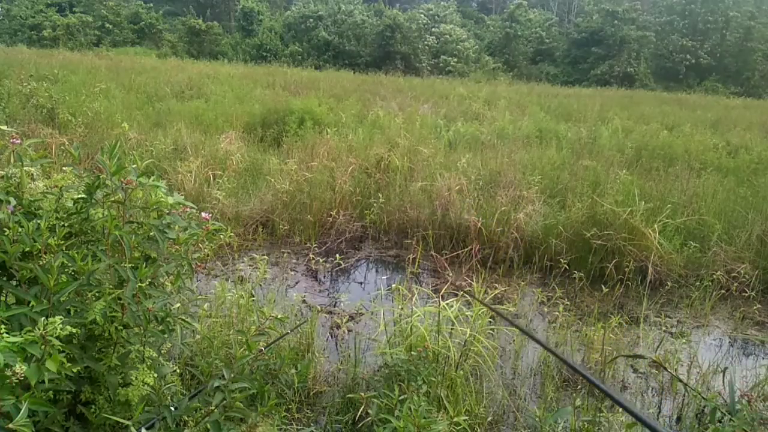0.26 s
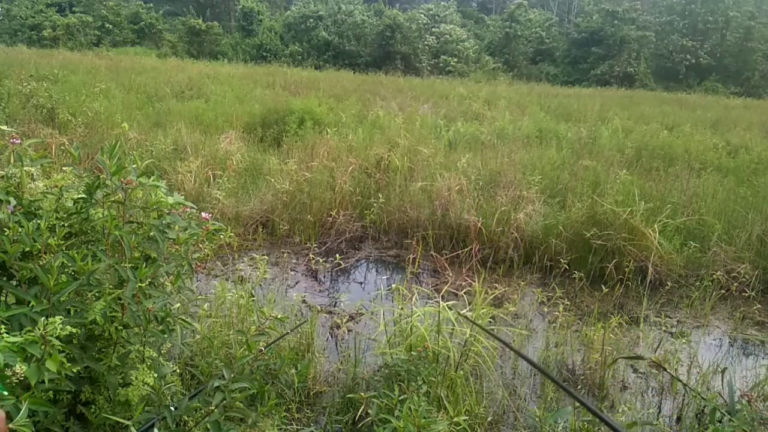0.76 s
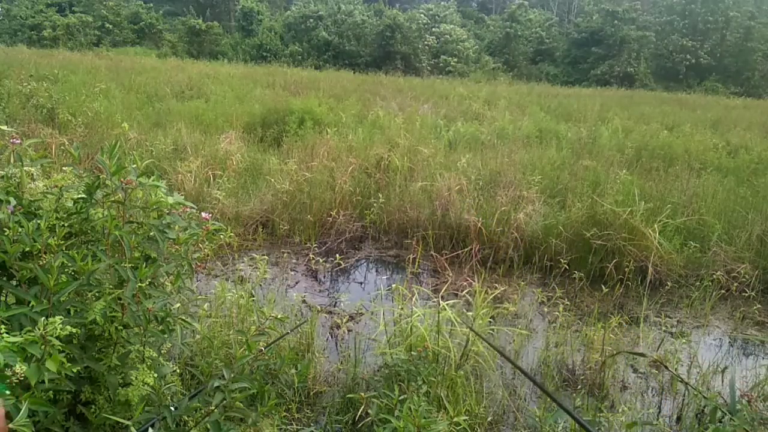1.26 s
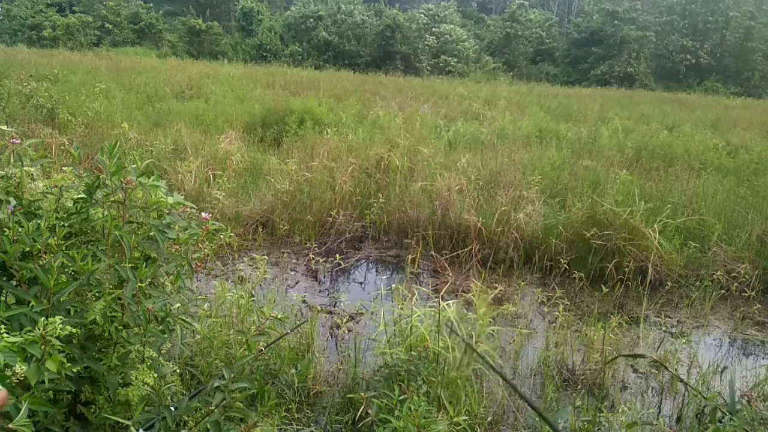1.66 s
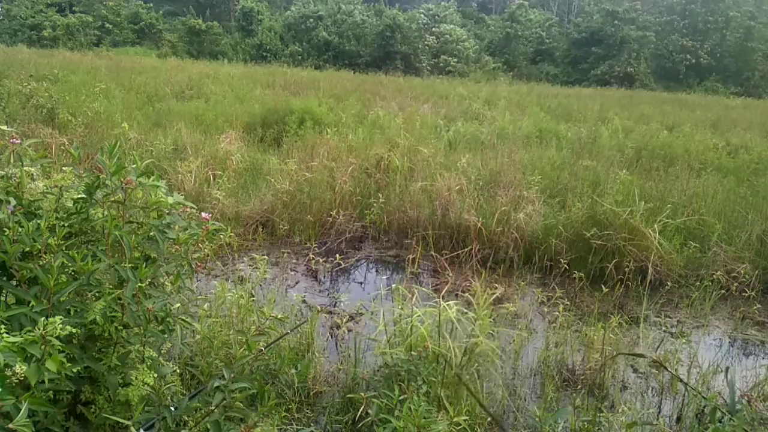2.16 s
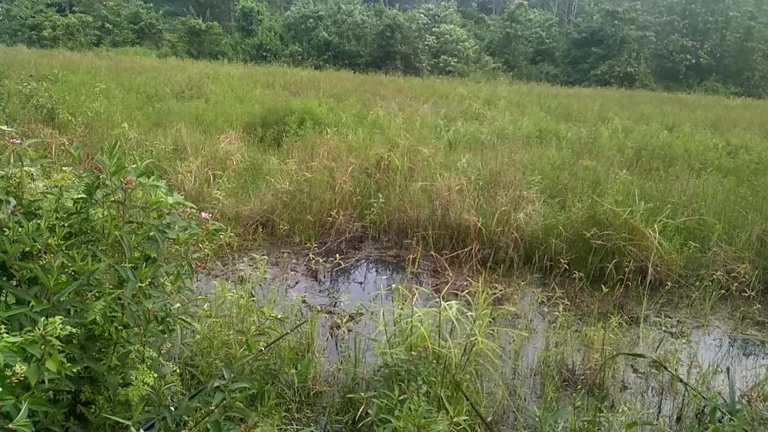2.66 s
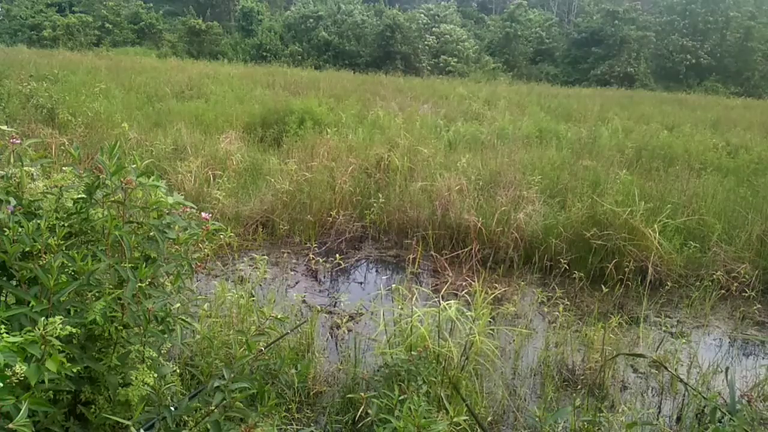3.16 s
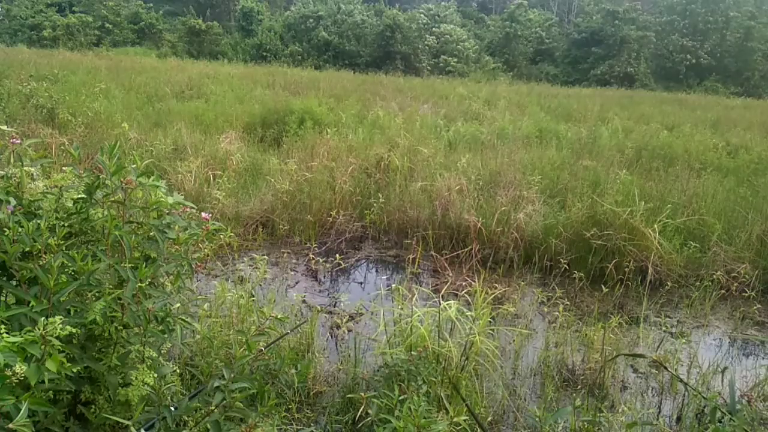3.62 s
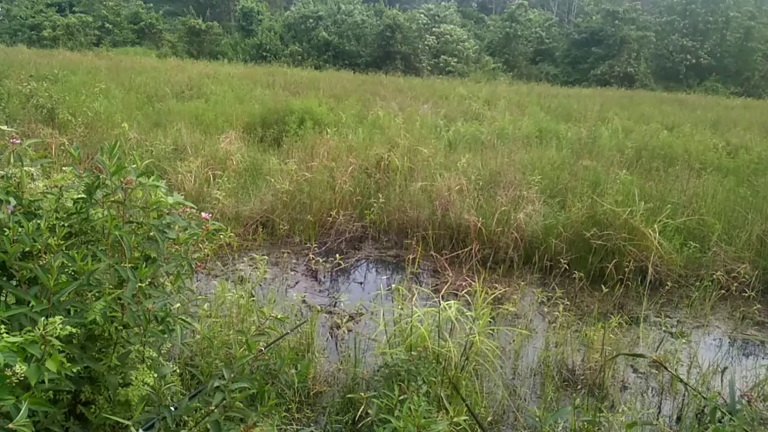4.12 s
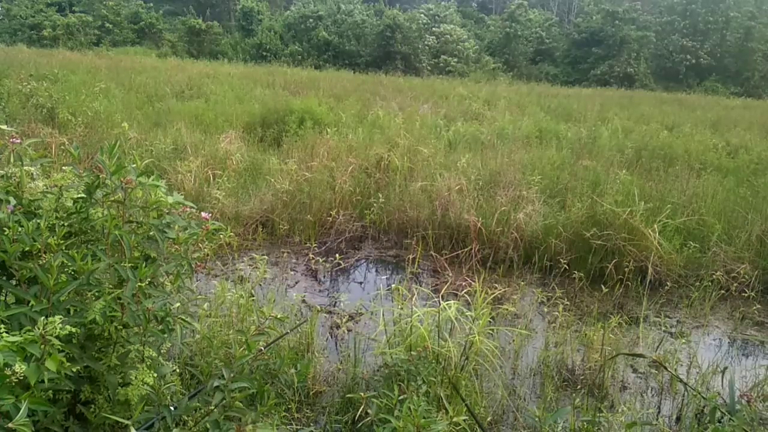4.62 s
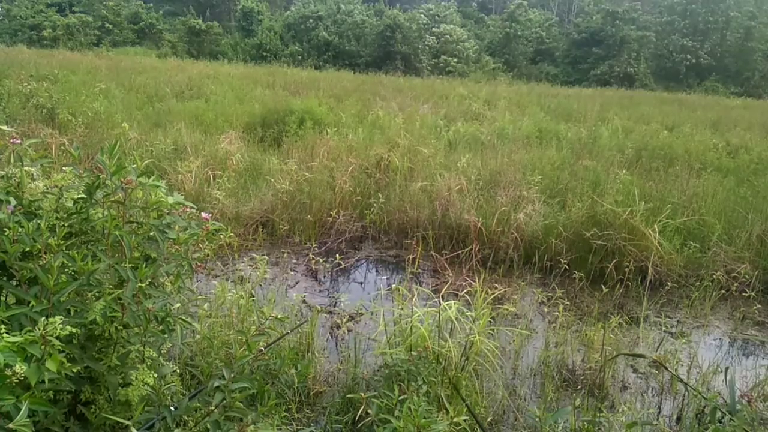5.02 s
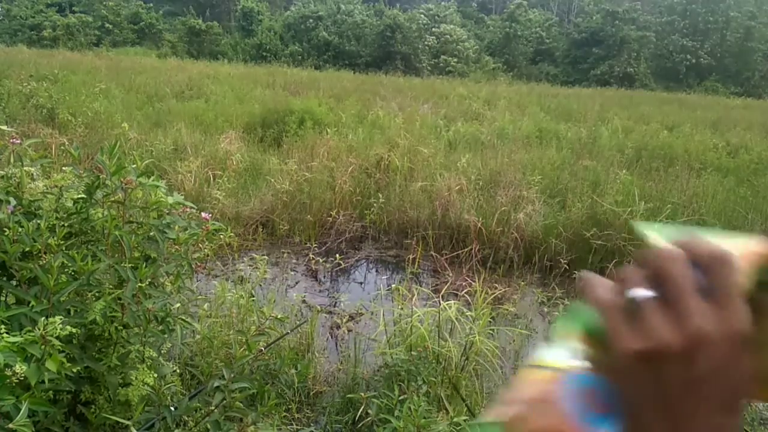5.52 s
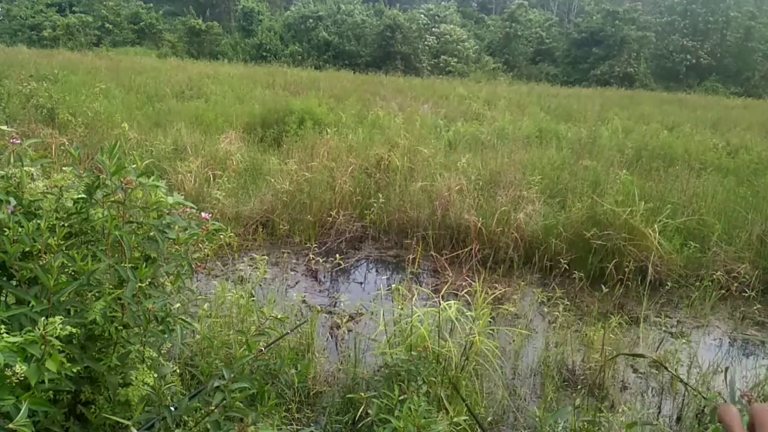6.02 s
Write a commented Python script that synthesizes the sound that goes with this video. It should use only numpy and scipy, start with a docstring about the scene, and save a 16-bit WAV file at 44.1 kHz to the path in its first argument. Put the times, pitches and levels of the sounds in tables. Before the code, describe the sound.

Marsh birds, crickets and katydids over a low rumble, with light handling knocks, until a nearby plastic bag crinkles from right to left.

```python
"""A plastic bag crackles close to the microphones, its film buckling as it is carried from right to left.
Before that an angler's gear ticks and thumps at arm's length. The place is a marsh on a summer day, taken
on a small camera with two microphone ports. One bird whips upward on the left, another repeats a double
chip on the right; katydids buzz and two crickets trill by scraping their wings.
Far off lie a hoarse bird song, a blur of leaves and a low rumble."""
import sys
import numpy as np
from scipy import signal
from scipy.fft import rfft, irfft, next_fast_len
from scipy.io import wavfile
from scipy.ndimage import uniform_filter1d, map_coordinates

SR = 44100
rng = np.random.default_rng(int(sys.argv[2]) if len(sys.argv) > 2 else 0)


def transcribe(u):
    """Save the signal u as a 16-bit wav file named by the first command-line argument.

    u: samples, shape (n,) or (channels, n), limited to [-1, 1]; the rate is SR.
    q: integer samples, one column per channel.
    """
    v = np.clip(np.atleast_2d(u).T, -1, 1)
    q = np.round(v * 32767).astype(np.int16)
    wavfile.write(sys.argv[1], SR, q)


N = 276948

# Levels are relative, ahead of panning and scatter; spectra give level per Hz.
# The bag's loudest buckles: t/s, length/s, level/dB, body at 600 Hz/dB, edge at 7500 Hz/dB
BUCKLES = [(4.824, 0.0015, -31, 8, 0), (4.833, 0.0041, -35, -7, -6), (4.873, 0.0031, -25.5, -7, 13),
           (4.899, 0.0071, -28, -9.5, -19), (4.951, 0.0032, -35, -5, -14), (4.959, 0.0046, -39, 6, 27),
           (4.994, 0.0014, -30.5, -1, -30), (5.006, 0.0045, -34.5, -3, 16), (5.027, 0.0021, -27, -19, -31),
           (5.038, 0.0061, -36.5, -11, -11), (5.082, 0.00015, -18, -2, -10.5),
           (5.163, 0.013, -34, 1.5, -7.5), (5.188, 0.0018, -30, -1, -30), (5.291, 0.0015, -36, 14, -2),
           (5.333, 0.0015, -25.5, -6, -10), (5.351, 0.0019, -35.5, 13, 3), (5.446, 0.00067, -28, 0, 11),
           (5.463, 0.0014, -26.5, 2, 2), (5.478, 0.0058, -39.5, 4, -13), (5.552, 0.0013, -37, -12, 0),
           (5.557, 0.0012, -33.5, -20, 1), (5.586, 0.0015, -41, -10, 15), (5.602, 0.0033, -36.5, 0, 8),
           (5.626, 0.0014, -36.5, 9, 0), (5.657, 0.002, -23, 6.5, 8), (5.682, 0.0005, -24, -10, 26),
           (5.696, 0.00067, -34, 25, 14), (5.743, 0.0038, -30.5, -16, 3.5), (5.751, 0.0011, -33.5, 17, -20),
           (5.796, 0.0017, -31.5, -22, 7), (5.8, 0.0011, -28, -22, 0), (5.816, 0.0023, -37, 39, 0),
           (5.845, 0.031, -41, 21, 13.5), (5.889, 0.0012, -27, -26, 3), (5.91, 0.0027, -38, -16, -20),
           (5.976, 0.012, -32, 11.5, -3.5), (5.989, 0.017, -38.5, 12, -12), (6.037, 0.0012, -33.5, -9, -4),
           (6.133, 0.003, -30.5, -48, -7), (6.166, 0.0032, -38.5, -3, 17), (6.217, 0.0034, -39, -20, 2),
           (6.24, 0.0091, -40.5, 4, 10), (6.271, 0.0006, -27, 0, 1)]
# The bag's path past the camera: t/s, lag of the left port/samples
BAG_PATH = [(4.4, 7), (5.3, 9.5), (5.6, -0.5), (6.28, -10)]
FILM_SPECTRUM = [(88, -40), (150, -13.5), (370, -10), (459, -9.5), (795, -10.5), (1460, -5.5), (2430, -4.5),
                 (3820, -5.5), (5650, -12), (8880, -11), (10400, -14.5), (13100, -29), (15400, -38),
                 (16300, -50)]
PALM_SPECTRUM = [(90, -22), (200, -9.5), (450, -8), (1200, -5.5), (2500, -23)]
SIZZLE_SPECTRUM = [(10500, -60), (11600, -6), (13000, -5), (14500, 7), (15700, -6), (16300, -30)]
# Strength of the crumpling, the sliding and the coding sizzle: t/s, level/dB
CRUMPLE_LEVEL = [(4.3, -100), (4.56, -63.5), (4.68, -59.5), (4.74, -69), (4.82, -56), (4.95, -46.5),
                 (5.06, -58.5), (5.2, -52), (5.3, -56.5), (5.8, -49.5), (6.02, -49.5), (6.08, -57),
                 (6.28, -47)]
SCRAPE_LEVEL = [(4.5, -75), (4.688, -88), (4.89, -55.5), (4.99, -58), (5.074, -51.5), (5.33, -51.5),
                (5.852, -50.5), (5.972, -55.5), (6.28, -61)]
SIZZLE_LEVEL = [(4.78, -102), (4.972, -68), (5.076, -70), (5.368, -77), (5.544, -79), (5.686, -74),
                (6.004, -75), (6.28, -74)]
# Handling knocks, gear first, then the bag being picked up: t/s, thump/dB, click/dB, tick/dB
KNOCKS = [(.011, -46, -54, -64), (.063, -42.5, -52, -53), (0.261, -50, -66, -70), (0.309, -67, -49, -59),
          (0.617, -43, -56, -50.5), (0.661, -46, -60, -52), (0.714, -42.5, -60, -58),
          (.765, -40, -55, -51.5), (.814, -44, -71, -61), (.863, -35.5, -55, -51), (0.937, -49, -72, -56),
          (1.014, -38, -60, -55), (1.093, -46, -57, -58), (1.7, -50, -66, -54), (2.245, -43, -56, -51),
          (2.569, -64, -62, -47.5), (2.582, -48, -61, -49), (2.607, -46, -75, -58),
          (2.637, -43.5, -77, -60), (3.211, -43.5, -64, -57), (3.257, -44.5, -61, -55.5),
          (3.341, -47, -71, -56), (3.709, -56, -61, -46), (3.867, -52, -53.5, -53), (4.174, -67, -74, -57),
          (4.372, -49, -82, -56), (4.442, -48, -76, -53.5), (4.566, -63, -65, -60), (4.605, -49, -46, -49),
          (4.628, -43, -58, -42.5), (4.664, -50, -40.5, -45.5), (4.722, -59, -65, -48.5),
          (4.757, -56, -46, -51), (4.771, -55, -41.5, -50)]
# Modes of a handling thump: f/Hz, level/dB, t60/s
THUMP_MODES = [(322, -1.5, 0.024), (420, -5.5, 0.028), (696, -2.5, 0.011)]
# A hand shifting on the grip: t/s, length/s, level/dB
GRIP_RUBS = [(1.506, 0.024, -60), (1.583, 0.048, -60), (1.664, 0.038, -62.5)]
# Spectra of a rub, a click and a tick: f/Hz, level/dB
GRIP_SPECTRUM = [(150, -9), (300, 0), (470, 3), (650, -13), (1200, -17)]
CLICK_SPECTRUM = [(500, 0.5), (900, 0), (1600, 0.5), (2500, -7)]
TICK_SPECTRUM = [(1200, -23), (2000, -4.5), (4000, -12), (6500, -19.5), (9000, -21), (11500, -36)]
# Calls of the bird on the left: t/s, pitch factor, lead note/dB, sweep/dB
WHIP_CALLS = [(.208, .975, -2, -1), (.687, 1, 0, 0), (1.053, .98, 1.5, -1), (1.731, .985, -3, -2.5),
              (2.991, 1, -1.5, -2), (3.559, 1, -1.5, -2), (3.944, .99, -3, -3), (4.652, .98, -5, -7)]
# Calls of the bird on the right: t/s, level/dB
CHIP_CALLS = [(.072, -18), (.247, -5), (.416, 0), (.6, -4), (.809, -1), (.992, -5), (1.168, -2),
              (1.335, -2), (1.495, 1), (1.661, 0.5), (1.855, 0), (2.008, 0), (2.166, 3), (2.321, 0.5),
              (2.481, 0), (2.626, -0.5), (2.794, 1.5), (2.949, 0.5), (3.098, 1.5), (3.228, 3), (3.377, 2),
              (3.519, 1.5), (3.669, 2.5), (3.805, 1), (3.945, 1), (4.078, 2), (4.212, 1), (4.358, 2),
              (4.497, 1)]
# Notes of a call: offset/s, length/s, first f/Hz, last f/Hz, peak/dB, peak place 0-1, swell/dB, fade/dB
WHIP_NOTES = [(-.08, 0.0126, 3610, 3030, -51.5, 0.3, 16, 6),
              (-.038, .048, 1970, 4976, -48.5, 0.3, 14, -0.2)]  # lead, sweep
CHIP_NOTES = [(-0.015, 0.009, 2510, 2640, -55, 0.44, 12, 5.8),
              (-.02, 0.0162, 2600, 2930, -52.5, 0.99, 6.7, 5.7),
              (-0.0098, .015, 2050, 2300, -55.5, 0.93, 5.6, 8.8)]  # short upper, long upper, lower
# How well each pitch carries to the tree line: f/Hz, level/dB
TREE_LINE = [(2000, -5.5), (3200, -3), (4400, -2), (4950, -1), (5150, -29)]
# Drift of the near katydid and the near cricket from a steady beat: t/s, lead/cycles
KATYDID_DRIFT = [(0, .07), (.75, 0), (2.5, .03), (3.7, .19), (4.6, .18), (6.28, .22)]
CRICKET_DRIFT = [(0, .23), (.9, .18), (2.8, .28), (3.5, .25), (4.1, .3), (6.28, .25)]
# Spectrum of katydid wings: f/Hz, level/dB
WING_SPECTRUM = [(4820, -34.5), (8200, -23.5), (8790, -19.5), (9790, -2), (10200, 0.5), (10800, -6),
                 (11700, -76), (15200, -75), (22000, -120)]
# The near cricket falters: from t/s, to t/s, drop/dB
CRICKET_LULLS = [(3.36, 3.6, 16), (4.66, 5.5, 7)]
# Strength of the far crickets: t/s, level/dB
DRONE_LEVEL = [(0, -86), (2, -77), (3, -84), (6.28, -64)]
# Songs of the distant bird, timed at mid-fall: t/s, level/dB
FAR_SONGS = [(.37, -78), (1.46, -80), (3.299, -79), (4.33, -79)]
# Its clearest notes: t/s, f/Hz, level/dB
FAR_NOTES = [(1.33, 4670, -66), (1.46, 4250, -64), (3.235, 4450, -63), (3.815, 3650, -59),
             (4.28, 4380, -65)]
# Spectra of far rumble and air, and of far birds and leaves: f/Hz, level/dB
RUMBLE_SPECTRUM = [(12, -64), (20, 5.5), (40, 1.5), (63, 5.5), (85, -2.5), (133, -2), (221, -17.5),
                   (290, -18.5), (401, -25), (1080, -38), (1500, -52), (1950, -78), (3300, -120)]
MEADOW_SPECTRUM = [(500, -120), (900, -15), (1500, -1.5), (2300, 2), (4700, 4), (5400, 0), (8500, -4),
                   (11300, 7.5), (11800, -120)]
# Strength of the rumble: t/s, level/dB
RUMBLE_LEVEL = [(0.0, -49.5), (1.54, -52), (3.1, -50.5), (6.28, -49.5)]
# Diffuse sound at the two ports: f/Hz, left-right correlation
PORT_LIKENESS = [(60, 0.9), (150, 1), (380, 0.56), (950, -0.13), (2380, 0.042), (5980, -0.15),
                 (15000, 0.26)]

QUIET_TOP_HZ, CAMERA_TOP_HZ = 11600, 16300
PUFF_LEAD = 256  # samples of padding ahead of a burst


def bag():
    """Close up, right to left: film snaps, crackles and hisses under a sliding hand."""
    lag = curve(BAG_PATH)
    snaps, grains = film_snaps(lag), film_grains(lag)
    palm = amp(3 * wobble(25)) * rush(PALM_SPECTRUM, patchy_db=2.5)
    scrape = amp(curve([(4.3, -100), *SCRAPE_LEVEL])) * palm
    hiss = rush(FILM_SPECTRUM, patchy_db=-4.5)
    crackle = amp(curve(CRUMPLE_LEVEL)) * (amp(4.5) * grains + amp(-2) * hiss)
    rustle = filtered(crackle + scrape, lambda hz: amp(-30 * (hz > 11500)))
    near = snaps + rustle + coding_sizzle() * amp((-2 - .15 * lag) * [[1], [-1]])  # treble is shaded most
    scatter = amp(-11) * echoes(near[:1], t60=.025, gap=.0015, size=SR // 20)
    pan_db = .8 - .26 * lag  # the camera body shades the far port
    return (near + scatter) * amp(pan_db * [[.5], [-.5]])


def film_snaps(lag):
    """Facets of the film buckle loudly, each favouring its own resonances."""
    snaps, facet_hz = np.zeros((2, N)), np.geomspace(200, 15500, 24)
    for s, length, db, body_db, edge_db in BUCKLES:
        tilt = [(220, body_db - 6.5), (600, body_db), (2700, 0),
                (5000, .6 * min(edge_db, 0)), (7500, edge_db)]
        gains_db = along(FILM_SPECTRUM, facet_hz) + along(tilt, facet_hz)
        gains_db += rng.normal(0, 4, len(facet_hz))
        snap = burst(list(zip(facet_hz, gains_db)), hold=length, t60=.003 + 1.25 * length, db=db)
        add(snaps, s - PUFF_LEAD / SR, snap, lag[int(s * SR)])
    return snaps


def film_grains(lag):
    """Small facets buckle in dense clumps from 4.3 s on."""
    clicks_per_s = 1700 * np.exp(.6 * wobble(60))
    at = np.flatnonzero((rng.random(N) < clicks_per_s / SR)[:-64] & (np.arange(N - 64) > 4.3 * SR))
    size, spread = rng.standard_normal((2, N))[:, at]
    size = np.sign(spread) * amp(3.6 * np.minimum(size, 2.4))
    late = np.rint(lag[at] + 4 * spread).astype(int)  # facets lie at different places on the bag
    clicks = np.array([np.bincount(at + late, size, N), np.bincount(at, size, N)])
    grains = coloured(patchy(clicks, depth_db=6, size=256, wide=5, long=1), FILM_SPECTRUM)
    return grains / np.sqrt(np.mean(grains[:, int(4.4 * SR):] ** 2))


def coding_sizzle():
    """Patchy top-treble sizzle that the camera's audio coding gives the crackling bag."""
    level_db = curve([(4.6, -110), *SIZZLE_LEVEL]) + 4.2 * wobble(30)
    return amp(level_db) * rush(SIZZLE_SPECTRUM, patchy_db=10)


def handling():
    """At arm's length: thumps, clicks, ticks and soft rubs; gear first, then the bag being picked up."""
    out, t = np.zeros((2, N)), np.arange(SR // 20) / SR
    for s, thump_db, click_db, tick_db in KNOCKS:
        ring = sum(amp(db + rng.normal(0, 2) - 60 * t / t60)
                   * np.sin(2 * np.pi * hz * rng.normal(1, .08) * t) for hz, db, t60 in THUMP_MODES)
        add(out, s, amp(thump_db) * ring * (1 - np.exp(-t / .0015)), lag=15.7)
        start = s - PUFF_LEAD / SR
        add(out, start, burst(CLICK_SPECTRUM, hold=.00031, t60=.016, db=click_db), lag=3.7)
        add(out, start, burst(TICK_SPECTRUM, hold=.00021, t60=.035, db=tick_db), lag=13.1)
    for s, length, db in GRIP_RUBS:
        add(out, s, burst(GRIP_SPECTRUM, hold=length, t60=.04, db=db), lag=12)
    return out + amp(-9) * echoes(out[:1], t60=.1, gap=.003, size=SR // 10)


def whip_bird():
    """Off to the left: a short lead note and a fast upward whistle, thrown back by the tree line."""
    whips = np.zeros((2, N))
    for s, pitch, *note_dbs in WHIP_CALLS:
        for db, (start, length, first_hz, last_hz, *shape) in zip(note_dbs, WHIP_NOTES):
            note = whistle(length, pitch * first_hz, pitch * last_hz, *shape)
            add(whips, s + start, amp(db) * note, lag=-4.5)
    whips *= amp([[0], [-3]])
    at_trees = coloured(whips[:1], TREE_LINE)
    for share, ripple_hz in ((.6, 645), (.5, 1570)):  # bounces off water and bank ripple the sweep
        whips = whips + share * np.roll(whips, round(SR / ripple_hz), axis=1)
    return whips + amp(-.5) * echoes(at_trees, t60=.55, gap=.0052)


def chip_bird():
    """Off to the right: a double chip whose upper note is short and long in turn."""
    chips = np.zeros((2, N))
    for k, (s, db) in enumerate(CHIP_CALLS):
        for start, *note in (CHIP_NOTES[k % 2], CHIP_NOTES[2]):
            add(chips, s + start, amp(db) * whistle(*note), lag=11)
    return chips + amp(-7.5) * echoes(chips[:1], t60=1, gap=.0052)


def katydids():
    """Each wing stroke of the near one swells and breaks off; the far chorus blurs into hiss."""
    stroke_hz = 102.2
    stroke = (stroke_hz * np.arange(N) / SR + curve(KATYDID_DRIFT)) % 1
    swell = unit(uniform_filter1d(.1 + stroke ** 3, size=24))
    wings = unit(coloured(rng.standard_normal(N), WING_SPECTRUM))
    near = ports(amp(-62 + .15 * wobble(6.2)) * swell * wings, lag=-4.5, pan_db=-12)
    chorus = rush(WING_SPECTRUM, patchy_db=.6)
    return near + amp(-55) * chorus * amp([[-.8], [.8]])


def cricket(phase, duty, hz, rise_hz, db):
    """Tone pulses that rise in pitch as the wing's file speeds up; the tooth strikes are a bit uneven."""
    progress = (phase % 1) / duty
    gate = uniform_filter1d((progress < 1) * 1., size=220)
    tone = sine(hz + rise_hz * np.minimum(progress, 1) + 75 * wobble(300))
    return amp(db + 2.2 * wobble(180) + .6 * wobble(6)) * gate * tone


def crickets():
    """A near one trills on the left, a lower one chirps in pulse pairs, far ones merge into a thin band."""
    t, pulse_hz = np.arange(N) / SR, 16.2
    phase = pulse_hz * t + curve(CRICKET_DRIFT) - .753
    lull_db = sum(drop_db * (t > start) * (t < end) for start, end, drop_db in CRICKET_LULLS)
    trill = cricket(phase, duty=.54, hz=7520, rise_hz=150, db=-64.5 + .62 * t - lull_db)
    since_chirp = (t - .1) % .2143
    pairs = (since_chirp < .095) * cricket(since_chirp / .052, duty=.7, hz=7060, rise_hz=110, db=-65)
    direct = ports(trill, lag=3.8, pan_db=13.5) + ports(pairs, lag=3.73, pan_db=5.5)
    band = lambda hz: np.exp(-((hz - 4640) / 160) ** 2)
    drone = amp(curve(DRONE_LEVEL) + 1.5 * wobble(12)) * unit(filtered(rng.standard_normal((2, N)), band))
    return drone + direct + amp(-5) * echoes(direct.mean(0, keepdims=True), t60=.2, gap=.005)


def far_bird():
    """Far off: a hoarse, broken trill slides down and arrives mostly as scatter; a few notes carry."""
    song, waver_hz = np.zeros(N), 120 * wobble(60) + 200 * wobble(400)
    broken = amp(3.5 * wobble(21))
    around = np.arange(-SR // 2, SR // 2)
    t = around / SR
    glide_hz = np.interp(t, [-.1, .1], [4780, 3800])
    fade = np.clip(np.minimum(t + .195, .26 - t) / .054, 0, 1)
    gate = fade * np.sin(np.pi * 21 * t) ** 4  # 21 notes a second
    for s, db in FAR_SONGS:
        at = np.clip(round(s * SR) + around, 0, N - 1)
        song[at] += amp(db) * broken[at] * gate * sine(glide_hz + waver_hz[at])
    notes = np.zeros((2, N))
    for s, hz, db in FAR_NOTES:
        add(notes, s, whistle(.029, 1.01 * hz, .99 * hz, db, place=.4, swell_db=9, fade_db=9))
    clear = notes + amp(-3) * echoes(notes[:1], t60=.15, gap=.004, size=SR // 5)
    return clear + ports(song, lag=3.2, pan_db=-22) + amp(14) * echoes(song[None], t60=.34, gap=.0033)


def marsh():
    """All around: far rumble below, a blur of distant birds and leaves above."""
    rumble = amp(curve(RUMBLE_LEVEL) + 1.2 * wobble(3)) * rush(RUMBLE_SPECTRUM, patchy_db=.5)
    meadow = amp(-65.5) * rush(MEADOW_SPECTRUM, patchy_db=1.6)
    return rumble * amp([[.6], [-.6]]) + meadow * amp([[.4], [-.4]])


def echoes(x, t60, gap, size=SR // 2):
    """Scatter from reeds and trees, different at each port, new every quarter second as the reeds sway."""
    step = SR // 4
    t, out = np.arange(size) / SR, np.zeros((2, N + 4 * step))
    for at in range(0, N, step):
        tail = rng.standard_normal((2, size)) * amp(-60 * t / t60) * (t > gap)
        scatter = signal.fftconvolve(x[:, at:at + step], tail / np.linalg.norm(tail[0]), axes=1)
        out[:, at:at + scatter.shape[1]] += scatter
    return out[:, :N]


def burst(spectrum, hold, t60, db):
    """A coloured puff of noise that swells fast, holds in uneven spurts, then dies in t60 seconds."""
    t = np.arange(SR // 10) / SR
    spurts = amp(3 * np.repeat(rng.standard_normal(len(t) // 30), 30))
    attack = np.minimum(t / (.0004 + .35 * hold), 1)
    shape = attack * amp(-60 * np.maximum(t - hold, 0) / max(t60, .002))
    puff = np.pad(rng.standard_normal(len(t)) * spurts * shape, (PUFF_LEAD, 0))
    chance_colour = np.sqrt(np.abs(uniform_filter1d(np.abs(rfft(puff)) ** 2, size=50)) + 1e-9)
    x = coloured(irfft(rfft(puff) / chance_colour, len(puff)), spectrum)
    return amp(db) * x * np.linalg.norm(shape) / np.linalg.norm(x)


def whistle(length, first_hz, last_hz, peak_db, place, swell_db, fade_db, bend=.7, edge_s=.0009):
    """A pure tone gliding along an S-curve; it swells to its peak and fades."""
    u = np.arange(round(length * SR)) / (length * SR)
    glide = u + bend * (u * u * (3 - 2 * u) - u)
    edges = np.minimum(np.minimum(u, 1 - u) * length / edge_s, 1)
    level_db = peak_db - np.interp(u, [0, place, 1], [swell_db, 0, fade_db])
    return amp(level_db) * edges * sine(first_hz + (last_hz - first_hz) * glide)


def rush(spectrum, patchy_db):
    """Diffuse stereo noise of rms 1."""
    pair = patchy(rng.standard_normal((2, N)), patchy_db, size=512, wide=6, long=14)
    turn = lambda hz: np.arccos(np.clip(along(PORT_LIKENESS, hz), -1, 1)) / 2
    mid, side = filtered(pair, lambda hz: amp(along(spectrum, hz)) * [np.cos(turn(hz)), np.sin(turn(hz))])
    return unit(np.array([mid + side, mid - side]))


def patchy(x, depth_db, size, wide, long):
    """x under a random gain field, smooth over wide bins and long frames."""
    frames = signal.stft(x, nperseg=size)[2]
    field = uniform_filter1d(uniform_filter1d(rng.standard_normal(frames.shape[-2:]), wide, 0), long, 1)
    return signal.istft(frames * amp(depth_db * unit(field)), nperseg=size)[1][..., :N]


def ports(x, lag, pan_db):
    """One source at both ports: the left lags by lag samples and is pan_db louder."""
    half = np.array([[.5], [-.5]])
    return filtered(x * amp(half * pan_db), lambda hz: np.exp(-2j * np.pi * hz * half * lag / SR))


def add(track, s, sound, lag=0):
    """Mix a mono sound into both ports at second s, the left lag samples late."""
    for port, late in zip(track, (lag, 0)):
        at = max(round(s * SR + late), 0)
        port[at:at + len(sound)] += sound[:len(port) - at]


def filtered(x, response):
    """x times a response of frequency."""
    n = x.shape[-1]
    padded = next_fast_len(n + 8192)
    return irfft(rfft(x, padded) * response(np.fft.rfftfreq(padded, 1 / SR)), padded)[..., :n]


def coloured(x, spectrum):
    """x shaped by (f/Hz, level/dB) points."""
    return filtered(x, lambda hz: amp(along(spectrum, hz)))


def along(points, hz):
    """(f/Hz, value) points on a log axis."""
    f, values = np.transpose(points)
    return np.interp(np.log(hz + 1), np.log(f + 1), values)


def curve(rows):
    """(t/s, value) rows at every sample."""
    return np.interp(np.arange(N) / SR, *np.transpose(rows))


def wobble(rate):
    """A smooth random curve, rate knots a second."""
    return map_coordinates(rng.standard_normal(int(N * rate / SR) + 4), [np.arange(N) * rate / SR])


def sine(hz):
    return np.sin(2 * np.pi * np.cumsum(hz) / SR)


def amp(db):
    return 10 ** (np.asarray(db) / 20)


def unit(x):
    return x / np.sqrt(np.mean(x ** 2) + 1e-20)


def scene():
    """The camera's audio coding dulls quiet sounds above 11.6 kHz; only the loud bag keeps its top treble."""
    quiet = marsh() + katydids() + crickets() + whip_bird() + chip_bird() + far_bird() + handling()
    return filtered(quiet, lambda hz: hz < QUIET_TOP_HZ) + bag()


def record(dry):
    """The left port is a little more sensitive; the camera cuts the deepest bass and the highest treble."""
    bass_cut = lambda hz: hz ** 2 / (hz ** 2 + 24 ** 2)
    return filtered(dry * amp([[.4], [-.4]]), lambda hz: bass_cut(hz) * (hz < CAMERA_TOP_HZ))


dry = scene()
out = record(dry)
transcribe(out)
```